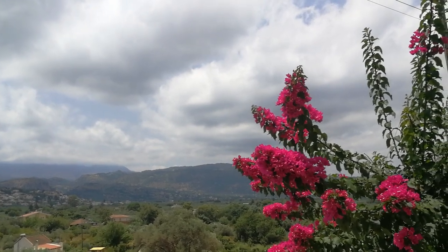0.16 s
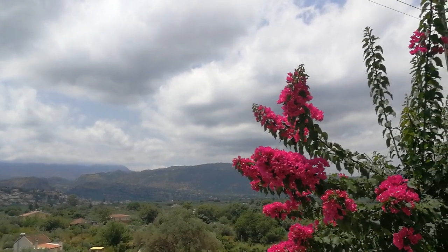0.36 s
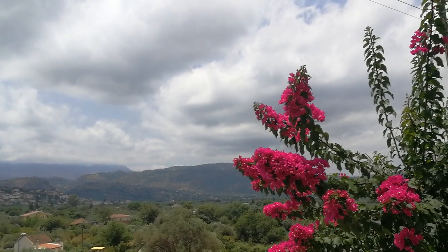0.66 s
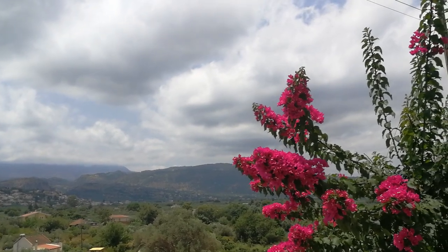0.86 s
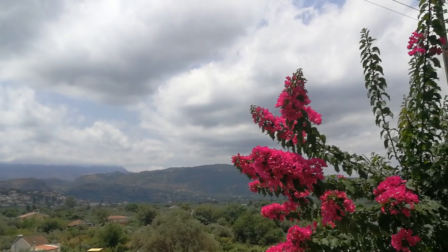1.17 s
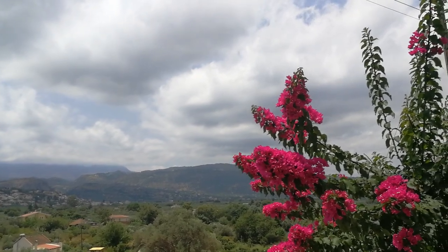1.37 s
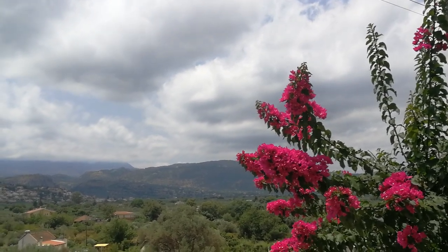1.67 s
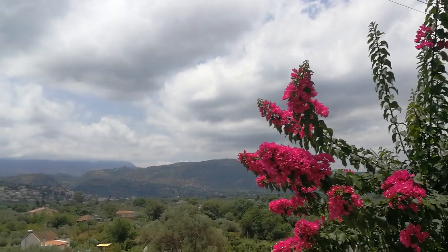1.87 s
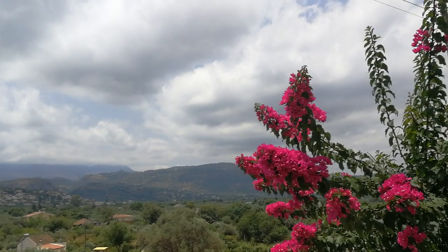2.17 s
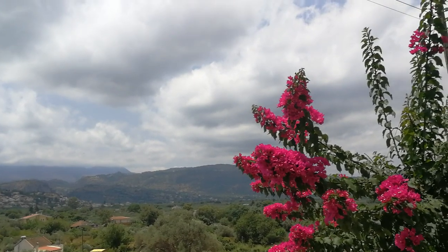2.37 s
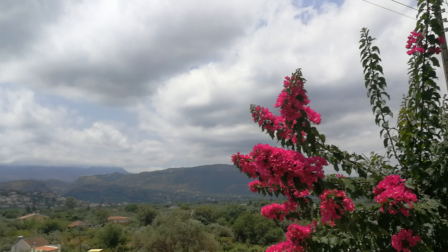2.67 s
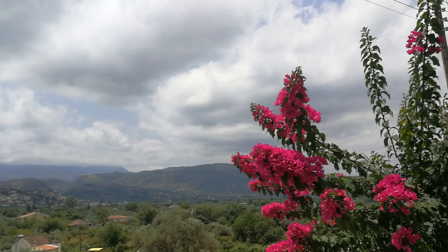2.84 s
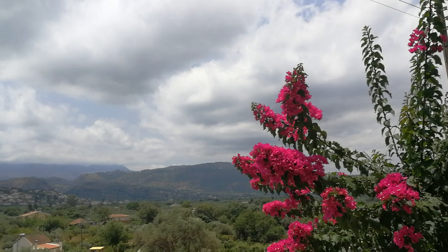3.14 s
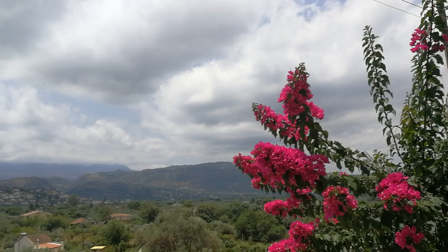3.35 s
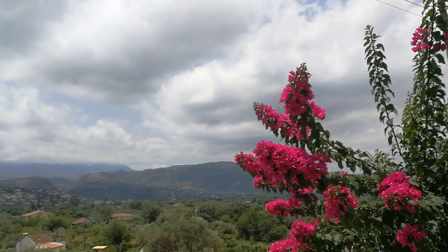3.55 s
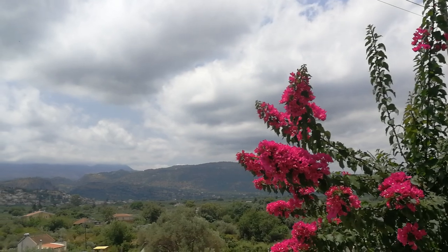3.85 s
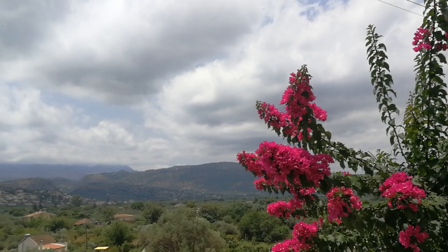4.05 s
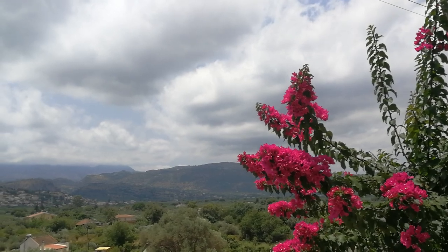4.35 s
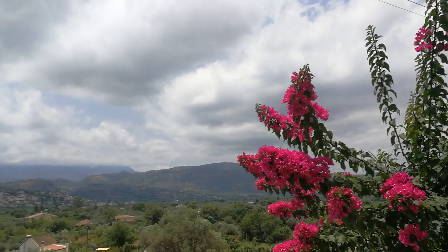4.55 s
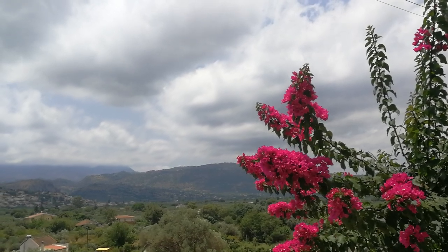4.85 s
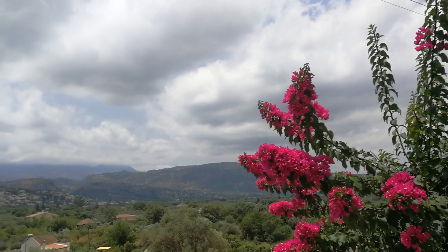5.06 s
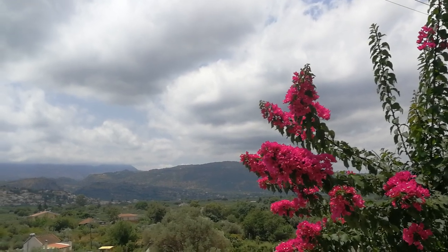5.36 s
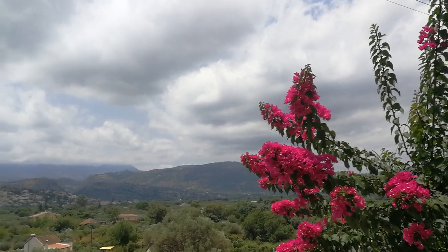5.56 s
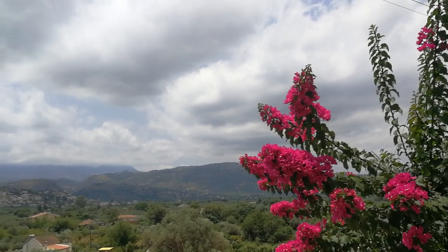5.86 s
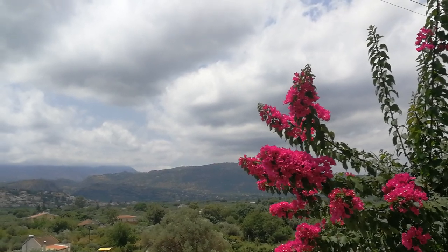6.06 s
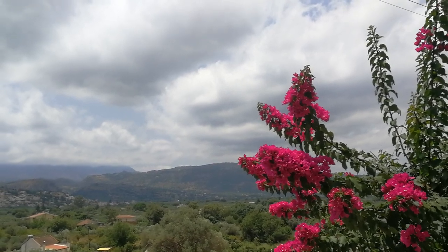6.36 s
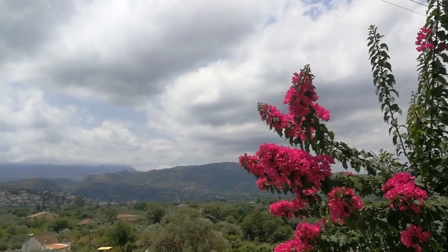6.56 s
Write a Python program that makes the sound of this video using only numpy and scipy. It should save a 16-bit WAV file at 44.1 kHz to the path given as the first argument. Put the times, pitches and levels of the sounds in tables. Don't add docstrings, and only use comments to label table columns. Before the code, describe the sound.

Outdoors on a warm, green hillside, a dense chorus of cicadas buzzes shrilly all around. One close cicada adds quick, bright, rasping bursts, about three a second, until roughly four seconds, then stops. The crowd continues more evenly, with slight dips. Faint wind puffs, small plastic clicks and a low distant hum lie underneath. A handheld camera's stereo microphones hear it in open air.

```python
import sys
import numpy as np
from scipy import signal
from scipy.fft import rfft, irfft
from scipy.io import wavfile
from scipy.ndimage import uniform_filter1d

SR = 44100
rng = np.random.default_rng(int(sys.argv[2]) if len(sys.argv) > 2 else 0)


def transcribe(signal):
    frames = np.atleast_2d(signal).T
    limited = np.clip(frames, -1, 1)
    pcm = np.round(limited * 32767).astype(np.int16)
    wavfile.write(sys.argv[1], SR, pcm)


def field_ratio(decibels):
    return 10 ** (np.asarray(decibels, dtype=float) / 20)


N = 296352
T = np.arange(N) / SR
HZ = np.maximum(np.arange(N // 2 + 1) * SR / N, 1)
SIDES = np.array([[1], [-1]])


def level(x, db):
    return x * field_ratio(db) / np.sqrt(np.mean(x ** 2))


def curves(table):
    seconds, *columns = np.transpose(table)
    return [np.interp(T, seconds, column) for column in columns]


def bump(s, length_s):
    return np.exp(-(2 * (T - s) / length_s) ** 2)


def walk(rate):
    hold = int(SR / rate)
    steps = np.repeat(rng.standard_normal(N // hold + 1), hold)
    smooth = uniform_filter1d(uniform_filter1d(steps, hold), hold)
    return 1.3 * smooth[:N]


def colour(points):
    hz, db = np.transpose(points)
    return field_ratio(np.interp(np.log(HZ), np.log(hz), db))


def mode(hz, width_hz):
    detune = (HZ ** 2 - hz ** 2) / (HZ * width_hz * 1.96)
    return (1 + detune ** 2) ** -1.5


def filtered_noise(gain, shape=N):
    return irfft(rfft(rng.standard_normal(shape)) * gain, N)


def strokes(rate_hz, jitter, scatter_db, rattle):
    phase = np.cumsum(rate_hz * (1 + jitter * walk(60)) / SR) + rng.random()
    stroke_sizes = field_ratio(scatter_db * rng.standard_normal(int(phase[-1]) + 1))
    size = stroke_sizes[phase.astype(int)]
    snap = np.diff(np.floor(phase), prepend=np.floor(phase[0]))
    ribs = np.exp(-(phase % 1) / 0.95) * rng.standard_normal(N)
    return size * (snap + rattle * ribs)


def foliage(t60, wet_db, lag_s):
    age = np.arange(SR // 6) / SR
    echoes = rng.standard_normal((2, len(age))) * 1000 ** (-age / t60)
    echoes *= field_ratio(wet_db) / np.sqrt(np.sum(echoes ** 2, axis=1, keepdims=True))
    lag = round(lag_s * SR)
    echoes[[0, 1], np.maximum([lag, -lag], 0)] += 1
    return rfft(echoes, N)


# start in seconds, length in seconds, effort in dB, left minus right in dB.
SOLO_PHRASES = [(0.02, 0.23, -49, -1), (0.378, 0.21, -49, -4.0), (0.722, 0.19, -49, -1.5),
                (1.055, 0.19, -50, -4), (1.361, 0.23, -48.5, -1.5), (1.711, 0.19, -48, -0.5),
                (2.061, 0.18, -49.5, -1.5), (2.429, 0.18, -49.5, -3), (2.737, 0.196, -50, -2.5),
                (3.058, 0.17, -50.5, -2.5), (3.373, 0.16, -48.5, -1.5), (3.788, 0.2, -49, -3.5)]


def phrasing():
    attack_db_s, swell_db_s, release_db_s = 330, 24.5, 400
    attack_lead_s, release_lead_s = 0.0022, 0.028
    effort_db = np.full(N, -79.0)
    for s, length_s, db, _ in SOLO_PHRASES:
        start, end = s - attack_lead_s, s + length_s - release_lead_s
        shape = db - 2.5 - swell_db_s * np.maximum(end - T, 0)
        shape -= attack_db_s * np.maximum(start - T, 0)
        shape -= release_db_s * np.maximum(T - end, 0)
        effort_db = np.maximum(effort_db, shape)
    s, _, _, pan_db = np.transpose(SOLO_PHRASES)
    return effort_db, np.interp(T, s + .1, pan_db)


SOLO_PITCHES = [2745, 2780, 3100, 3500, 5370, 5545, 5661, 5700, 6900, 8000, 8281, 8460, 8560, 9250, 10985,
                11000, 11270, 11445, 13250, 13800, 14170]
# width in Hz, level in dB.
SOLO_RINGS = [(60, 0), (300, -8.5), (45, -1.5), (198, -9.5), (200, 2), (70, 8), (50, 14.5), (330, 8.5),
              (1500, -0.5), (250, 3), (70, 10.5), (70, 15), (342, 3), (700, -16), (70, 3), (252, -1.5),
              (150, -5), (120, -3.5), (400, -12), (250, -16.5), (347, -13.5)]


def soloist():
    effort_db, pan_db = phrasing()
    last_s = 4.1
    drive = level(strokes(227, .012, 0.56, 0.13), 0) * field_ratio(effort_db) * (T < last_s)
    body_power = 0
    for hz, (width_hz, db) in zip(SOLO_PITCHES, SOLO_RINGS):
        body_power = body_power + (field_ratio(db) * mode(hz, width_hz)) ** 2
    late_s = np.interp(HZ, np.arange(0, SR / 2, 300), .0044 * rng.random(74))
    spread = np.exp(-2j * np.pi * np.cumsum(late_s) * SR / N)
    path = foliage(.05, -3, 16 / SR)
    sound = irfft(rfft(drive) * np.sqrt(body_power) * spread * path, N)
    return field_ratio(21.5) * sound * field_ratio(SIDES * (pan_db + 0.5) / 2)


# time in seconds, effort in dB, left minus right in dB.
CROWD_PATH = [
    (0, -40, -2.5),
    (1.5, -39.5, -0.3),
    (2.6, -39.5, 0),
    (3.2, -39, -2.5),
    (3.5, -39.5, -1),
    (4.3, -40, 0),
    (5.4, -40.5, -0.5),
    (5.97, -39.5, 0),
    (6.72, -40.5, -1),
]
# middle in seconds, length in seconds, dip of low voices in dB, dip of high voices in dB.
CROWD_LULLS = [(0.123, .14, 1.5, 2), (0.288, .08, .5, 2), (0.618, 0.13, 4, 1), (.94, .1, 4.5, 2),
               (1.29, 0.12, 3, 4.5), (1.65, 0.17, 2.5, 3.5), (2.03, 0.2, 3, 2), (2.382, .12, 0, 1.5),
               (2.53, .14, 2.5, 1.5), (2.62, .1, 1, 2), (2.94, 0.14, 6, 4.5), (3.32, 0.2, 1, 3),
               (3.66, .15, 4.5, 4), (4.088, .19, 5, 3.5), (4.554, 0.13, 3.5, 1.5), (4.903, 0.1, 4.5, 2),
               (5.204, 0.14, 2.5, 0.5), (5.625, .14, 3, 1), (5.76, 0.13, 4.5, 2.5), (6.105, .14, 5, 1.5),
               (6.54, 0.17, 2.3, 1)]
# middle in seconds, swell in dB.
LARGE_INSECT_SWELLS = [(.2, 0), (.5, 3), (.85, 2.5), (1.17, 2.5), (1.52, 2), (1.85, 1.5), (2.18, 3.5),
                       (2.5, 2), (2.8, 2.5), (3.18, 3.5), (3.45, 1.5), (3.94, 2), (4.33, 1.5), (4.75, 2),
                       (5.4, 1.5), (5.92, -0.5)]


def breathing():
    effort_db, pan_db = curves(CROWD_PATH)
    low_dip = sum(low * bump(s, length_s) for s, length_s, low, _ in CROWD_LULLS)
    high_dip = sum(high * bump(s, length_s) for s, length_s, _, high in CROWD_LULLS)
    swell = sum(db * bump(s, 0.14) for s, db in LARGE_INSECT_SWELLS)
    low_db = effort_db - low_dip
    high_db = effort_db + 3 - high_dip
    deep_db = effort_db - 20 + swell - 0.44 * low_dip
    return low_db, high_db, deep_db, pan_db


# frequency in Hz, level in dB per Hz.
CROWD_TONE = [(1000, -61), (1700, -45), (2630, -12.5), (3160, -14), (3560, -20), (4050, -27.5),
              (4570, -8.5), (5160, 0.5), (6200, -9.5), (7680, -2), (9490, -16), (10300, -21.5),
              (10700, -21.5), (13100, -32), (15500, -31.5)]


def crowd(count=10):
    total = 0
    for pace, side, turn in rng.uniform(-1, 1, (count, 3)):
        swing = np.sin(2 * np.pi * (2.8 + .5 * turn) * T + np.pi * pace)
        phrase = field_ratio(0.83 * np.tanh(3 * swing))
        singer = phrase * strokes(215 + 35 * pace, .02, 2.34, 0.095)
        total = total + rfft(singer) * foliage(0.13, 4.0, .0007 * side)
    total = total * colour(CROWD_TONE) / np.sqrt(1 + (HZ / 14600) ** 30)
    low_share = 1 / (1 + (HZ / 6050) ** 14)
    deep_share = 1 / (1 + (HZ / 3950) ** 30)
    deep = irfft(total * np.sqrt(deep_share), N)
    low = irfft(total * np.sqrt(low_share * (1 - deep_share)), N)
    high = irfft(total * np.sqrt(1 - low_share), N)
    low_db, high_db, deep_db, pan_db = breathing()
    deep = level(deep, 9.66) * field_ratio(deep_db + SIDES * 0.15)
    low = level(low, 2.5) * field_ratio(low_db + SIDES * (pan_db + .3) / 2)
    high = level(high, 2.31) * field_ratio(high_db + SIDES * (.15 * pan_db - .4) / 2)
    return deep + low + high


# frequency in Hz, level in dB per Hz.
AIR_SHARED = [(12, -44), (20, -10), (48, -8), (70, -8), (140, -5), (220, -12), (248, -8.5), (523, -21.5),
              (1740, -25), (2200, -14.5), (2860, -10), (4840, -120)]
# frequency in Hz, level in dB per Hz.
AIR_OPPOSITE = [(12, -68), (20, -36), (192, -16.5), (340, -17), (367, -15), (856, -14.5), (1740, -26),
                (2200, -2.5), (2860, -37), (4840, -120)]
# pitch in Hz, level in dB.
MACHINE_HUM = [
    (64, -72),
    (148, -69),
    (197, -73),
]


def air():
    shared = filtered_noise(colour(AIR_SHARED))
    opposite = filtered_noise(colour(AIR_OPPOSITE))
    hum = 0
    for hz, db in MACHINE_HUM:
        loudness = field_ratio(db + 2 + 0.65 * walk(4.15))
        turns = hz * np.cumsum(1 + 0.0078 * walk(4.2)) / SR
        hum = hum + loudness * np.sin(2 * np.pi * turns)
    return level(shared, -66.5) + SIDES * level(opposite, -68.5) + field_ratio(-3) * hum


# start of the peak in seconds, peak in dB, hold in seconds.
WIND_PUFFS = [
    (.05, -68, .01),
    (.56, -69, .06),
    (1.73, -58.5, .02),
    (1.935, -61.5, .05),
    (2.64, -59.5, .03),
    (3.31, -48, 0.053),
    (3.518, -60, .02),
    (6.57, -72, .02),
]


def gusts():
    rise_db_s, fall_db_s = 220, 150
    gust_db = -75.5 + 3.0 * walk(9)
    for s, db, hold_s in WIND_PUFFS:
        rise = rise_db_s * np.maximum(s - T, 0)
        fall = fall_db_s * np.maximum(T - s - hold_s, 0)
        gust_db = np.maximum(gust_db, db - rise - fall)
    return gust_db


def wind():
    gust_db = gusts()
    rumble = filtered_noise(mode(40, 50), (2, N))
    rumble = rumble / np.sqrt(uniform_filter1d(rumble ** 2, size=1500))
    rumble = rumble[0] + 0.077 * SIDES * rumble[1]
    rustle = filtered_noise(mode(350, 1400), (2, N))
    rustle_db = 2 * gust_db + 3.0 * walk(40)
    return level(rumble, -0.32) * field_ratio(gust_db) + level(rustle, 29.5) * field_ratio(rustle_db)


# start in seconds, level in dB, first pitch in Hz,
# time to fade by 60 dB in seconds, left minus right in dB.
HOUSING_TICKS = [
    (1.2251, -32, 1450, .008, 8),
    (1.9392, -33, 1850, .015, 10),
    (4.499, -52, 1200, .012, 6),
]


def ticks():
    out = np.zeros((2, N))
    length = SR // 20
    for s, db, hz, t60, pan_db in HOUSING_TICKS:
        start = round(s * SR)
        lag_s = np.array([[0], [.00035]])
        age = np.maximum(np.arange(length) / SR - lag_s, 0)
        turns = hz * (0.253 * age + 0.846 * 0.00252 * (1 - np.exp(-age / 0.0024)))
        envelope = (1 - np.exp(-age / 0.0005)) * 1000 ** (-age / t60)
        ring = envelope * (np.sin(2 * np.pi * turns) - 0.18 * np.sin(.9 * np.pi * turns))
        out[:, start:start + length] += field_ratio(db + 6.5 + (SIDES - 1) * pan_db / 2) * ring
    return out


# time in seconds, pitch in Hz, level in dB.
BIRD_CALL = [
    (3.82, 1020, -93),
    (3.85, 1030, -78),
    (3.95, 1040, -75),
    (4.05, 1070, -78),
    (4.16, 1075, -78),
    (4.19, 1075, -95),
]


def bird():
    hz, db = curves(BIRD_CALL)
    calling = (T > BIRD_CALL[0][0]) & (T < BIRD_CALL[-1][0])
    db = np.where(calling, db + 6, -150)
    voices = 0
    for ratio, share_db in ((1, 1.5), (1.085, -3.5)):
        flutter = 0.47 + 0.65 * walk(70)
        voices = voices + field_ratio(share_db) * flutter * np.sin(2 * np.pi * np.cumsum(hz * ratio) / SR)
    return field_ratio(db + SIDES * -3.0) * voices


def scene():
    return soloist() + crowd() + air() + wind() + ticks() + bird()


# from Hz, to Hz, treble level in dB at which the band falls silent.
WEAK_BANDS = [(3700, 3800, -47.5), (3800, 3900, -49.5), (3900, 4060, -48.5), (11850, 12150, -48.5),
              (12150, 12500, -49), (12500, 12800, -50), (12800, 13050, -49.5), (14480, 15100, -54),
              (15100, 16000, -56.5)]


def starve(x):
    hz, _, frames = signal.stft(x, SR, nperseg=1024)
    treble_bins = (hz > 10700) & (hz < 11700)
    treble = np.sum(np.abs(frames[:, treble_bins]) ** 2, axis=1).mean(axis=0)
    treble_db = 10 * np.log10(uniform_filter1d(treble, size=3) * 4 / 3 + 1e-12)
    kept = np.ones(frames.shape[1:])
    for low_hz, high_hz, limit_db in WEAK_BANDS:
        waver = np.repeat(rng.standard_normal(len(treble)), repeats=2)[:len(treble)]
        kept[(hz >= low_hz) & (hz < high_hz)] = treble_db < limit_db + 2.2 * waver
    return signal.istft(frames * kept, SR, nperseg=1024)[1][:, :N]


def top_cut(x):
    return signal.sosfilt(signal.butter(12, 15660, fs=SR, output="sos"), x)


def record(dry):
    mix = starve(dry)
    return top_cut(mix)


dry = scene()
out = record(dry)
transcribe(out)
```